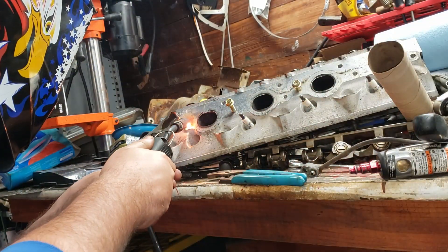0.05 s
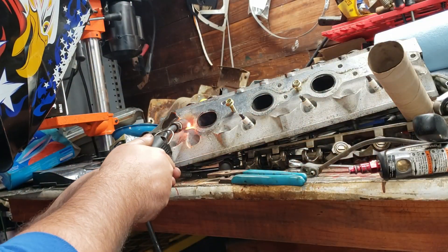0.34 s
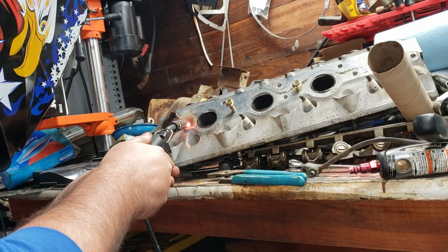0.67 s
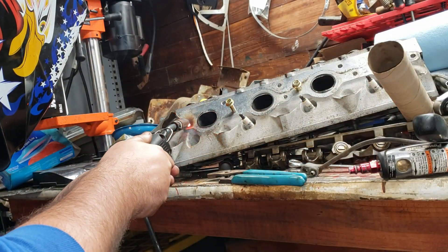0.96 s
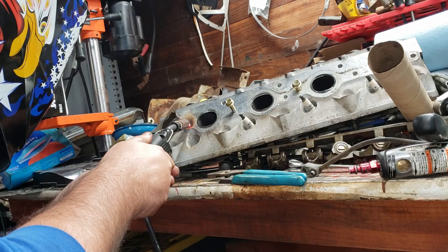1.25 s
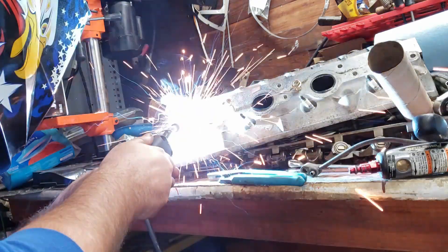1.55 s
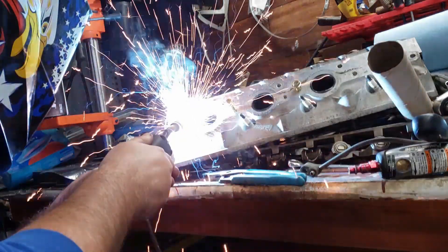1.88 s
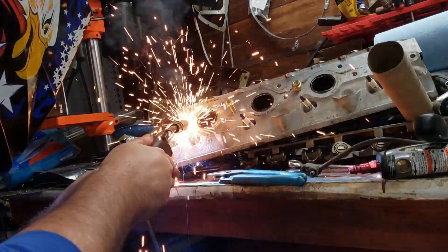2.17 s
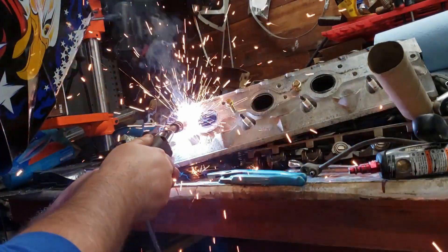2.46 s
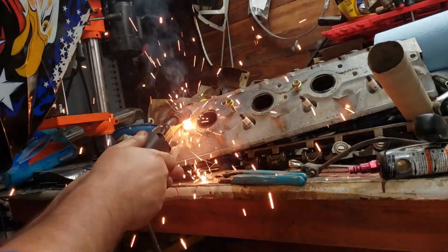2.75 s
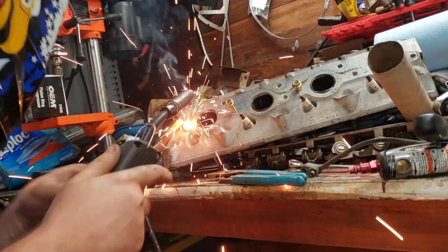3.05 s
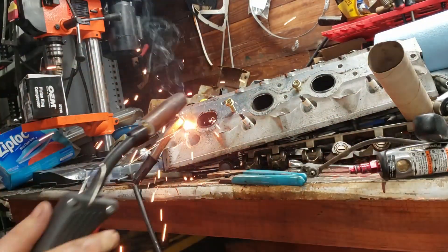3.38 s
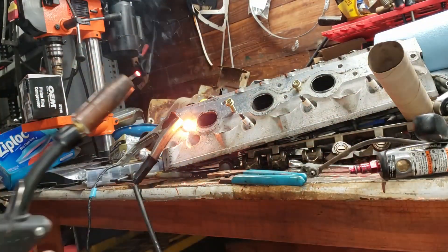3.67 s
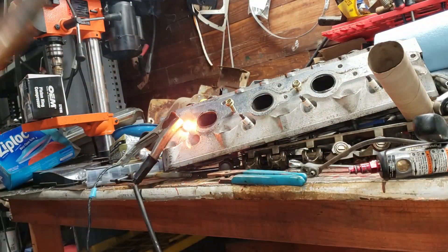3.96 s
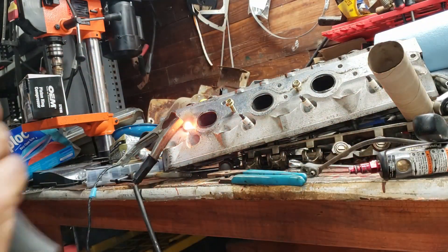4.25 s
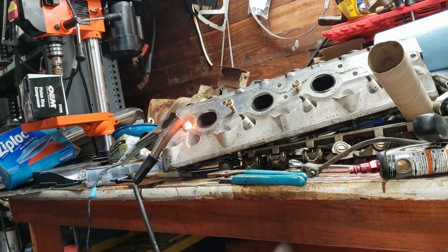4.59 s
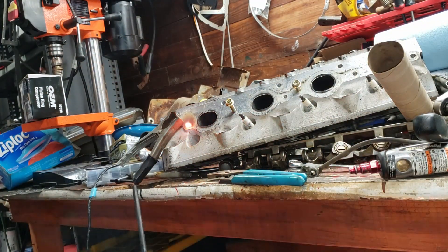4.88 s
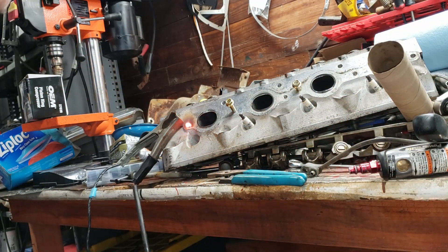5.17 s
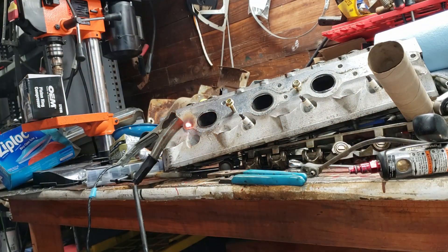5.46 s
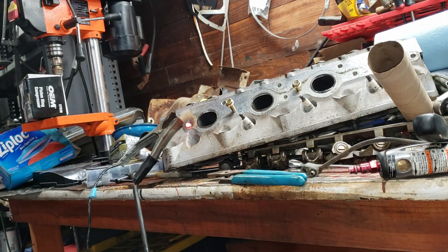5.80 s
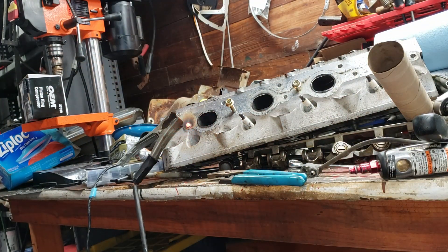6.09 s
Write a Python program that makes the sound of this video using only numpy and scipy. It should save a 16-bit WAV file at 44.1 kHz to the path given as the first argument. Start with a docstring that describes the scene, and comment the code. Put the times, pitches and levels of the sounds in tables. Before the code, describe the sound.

A wire-feed welder pops twice and crackles briefly over a machine hum, then five heavy knocks on wood follow.

```python
"""Wire welding in a garage

A wire-feed welder on the workbench, in stereo. Left of the microphone the wire strikes with two blasts,
then the arc crackles and flutters for just over a second. The torch is put down with light ticks; five
heavy knocks on wood follow, close up. Behind it all the machine hums and its fan blows, ducked under
the arc by the recorder's gain control and swelling again in the pauses."""
import sys
import numpy as np
from scipy import signal
from scipy.fft import rfft, irfft
from scipy.io import wavfile
from scipy.ndimage import uniform_filter1d, minimum_filter1d

SR = 44100
rng = np.random.default_rng(int(sys.argv[2]) if len(sys.argv) > 2 else 0)


def log_audio(samples):
    """Write samples as a 16-bit WAV file to the path given in sys.argv[1]."""
    # one column per channel
    frames = np.atleast_2d(samples).T
    # limit to full scale, then quantise
    limited = np.clip(frames, -1, 1)
    pcm = np.round(limited * 32767).astype(np.int16)
    wavfile.write(sys.argv[1], SR, pcm)


N = 270333
TIME = np.arange(N) / SR

# Levels in the tables are relative: each source sets its own gain.
# the cold wire shorts, glows with a low roar and blows apart: blast_s, crack_db, flare_db, glow_s, glow_db
WIRE_BLASTS = [(1.3561, -17, -12, .022, -30), (1.4225, -10, -6.5, .046, -21.5)]
# the loudest shorts of the wire: start_s, level_db
LOUD_SHORTS = [(1.4835, -9), (1.5044, -8), (1.5628, -10), (1.6292, -7), (1.6734, -9), (1.6974, -7),
               (1.722, -7), (1.7399, -9), (1.8292, -7), (1.8477, -9), (1.8716, -10), (1.931, -11),
               (1.954, -10), (1.9984, -11), (2.0457, -8), (2.0644, -12), (2.0794, -11), (2.0956, -8),
               (2.1296, -9), (2.1555, -11), (2.1914, -8), (2.2228, -8), (2.2544, -9), (2.2817, -10),
               (2.3226, -7), (2.3386, -7), (2.383, -12), (2.4224, -11), (2.4548, -7), (2.5556, -10),
               (2.5721, -8), (2.5964, -8)]
# spells of the arc, a first touch, a false start and two long runs: start_s, end_s, sizzle_db
ARC_SPELLS = [(1.333, 1.334, -29), (1.497, 1.525, -27.5), (1.56, 1.942, -32.5), (1.993, 2.605, -33)]
# the crackle, with a ring of the casting near 955 Hz: frequency_hz, density_db
CRACKLE_SPECTRUM = [(150, -22), (300, -5), (550, -7), (840, -5), (955, 4), (1060, -9), (1650, -2),
                    (3150, -7), (3700, -1.5), (5500, -3), (7000, 1.5), (8800, -5), (11300, 1), (13000, 0),
                    (15500, 4), (17500, -6)]
# the crack of a pop, heard straight from the arc: frequency_hz, density_db
CRACK_SPECTRUM = [(100, -6), (400, 0), (1000, -4.5), (2200, -4), (4000, 7), (9000, -15), (16000, 3)]
# the flutter of hot gas: frequency_hz, density_db
GAS_SPECTRUM = [(25, -36), (50, -9), (75, -3.5), (120, -2.5), (180, 0.5), (260, 1), (340, -10.5),
                (600, -23), (1500, -28), (4000, -83)]
# its strength while the arc burns: time_s, level_db
GAS_LEVELS = [(1.5, -38), (1.528, -35.5), (1.608, -42), (1.68, -34), (1.81, -43), (1.886, -34),
              (2.2, -38.5), (2.214, -42), (2.35, -33.5), (2.59, -40), (2.62, -40)]
# blows on wood, soft at first, then harder:
# start_s, thud_db, ring_db, corner_hz, clack_hz, clack_db, rebound_s, rebound_share
WOOD_KNOCKS = [(4.9168, -13.5, -24, 390, 336, -27, 0.0038, 0.02),
               (5.1762, -14, -16.5, 1720, 620, -26, 0.0014, 0.15),
               (5.3915, -9, -16.5, 2570, 1010, -50, 0.00202, 0.1),
               (5.6115, -9.5, -15, 3260, 1110, -13.5, .00092, 0.56),
               (5.8303, -6.5, -10, 2920, 1570, -15, 0.0011, 0.15)]
# the ring of the wood: pitch_hz, level_db, t60_s
WOOD_MODES = [(163, -21, 0.28), (179.3, -22, 0.36), (217.4, -9.5, 0.17), (246.8, -15.5, 0.29),
              (337.4, -18.5, 0.26), (363, -14, 0.22), (444, -9.5, 0.17), (638, -12.5, 0.18),
              (662, -10.5, 0.21), (644, -18, 0.27), (725, -22, 0.44), (765, -33.5, 0.76), (880, -25, 0.36),
              (989, -11, 0.17), (1600, -35, 0.13), (1730, -19, 0.24), (2263, -16, 0.097),
              (2377, -13, 0.072), (2660, -29, 0.077), (3500, -18, 0.09), (4215, -24, 0.3)]
# the noise of a knock: frequency_hz, density_db
KNOCK_SPECTRUM = [(30, -28), (100, -9), (200, -13), (310, -5), (450, -3), (700, 0.5), (1000, -3.5),
                  (1300, -10.5), (2400, -11.5), (3400, -12), (5000, -11.5), (7000, -12.5), (9000, -19.5),
                  (15500, -19.5)]
# light ticks of metal: start_s, level_db, centre_hz
TORCH_TICKS = [(2.7515, -47, 9000), (3.964, -44, 11500), (4.2955, -35.5, 12000), (4.305, -45, 9000),
               (4.342, -35, 3700), (4.497, -49, 12000)]
# the transformer's partials: multiple, level_db, left_minus_right_db, left_lead_rad
HUM_PARTIALS = [(1.005, -24, 5, 1.5), (1.998, 0, 0, 0.4), (2.99, -11, -2.5, 0.54), (4.96, -38, -12, 0.5),
                (5.96, -10, -6, -1.77), (9.84, -19, -3, 4), (11.96, -16.5, -6.5, 3.5),
                (13.96, -16, -4, 2.5), (18.15, -27.5, -15, -3.5), (22.43, -24, -1, 5)]
# the transformer, heard from a shifting position: time_s, hum_db, whine_db
TRANSFORMER_LEVELS = [(0, -51, -76), (1.3, -51, -73), (3.4, -54, -65), (3.95, -51, -66.5),
                      (4.6, -54.5, -65), (6.13, -55.5, -70)]
# the fan's tones, against the hum: pitch_hz, level_db
BLADE_TONES = [(287.8, -17), (499.7, -25.5), (596, -17.5), (695, -23.5)]
# the fan's rush and background hiss, with treble peaks from the microphone's resonance:
# frequency_hz, density_db
RUSH_AND_HISS_SPECTRUM = [(30, -18.5), (120, -16.5), (190, -10), (250, -1.5), (420, -10), (700, -9),
                          (1050, -17.5), (2600, -18), (3800, -22.5), (4600, -25.5), (6300, -29),
                          (7100, -25), (8600, -33.5), (11500, -25), (13800, -22.5), (15100, -15.5),
                          (15900, -22.5)]
# the garage's reverberation: frequency_hz, t60_s
GARAGE_DECAY = [(100, 0.34), (700, 0.23), (2500, 0.25), (7000, 0.24), (15000, 0.19)]
# likeness of the room's sound at the two microphones: frequency_hz, correlation
MIC_LIKENESS = [(60, 0.88), (200, 0.88), (500, 0.48), (1000, 0), (2500, 0.18), (15000, 0)]

HUM_HZ = 120.05  # twice the line frequency
IGNITE_S, SIZZLE_DIE_S, GAS_DIE_S = 0.0025, 0.0023, 0.072
SENSE_HZ, THRESHOLD_DB, BACK_OFF_S = 3780, -28, 0.035  # the gain control backs off fast
WAIT_S, RECOVER_DB_PER_S = 0.89, 10  # then waits and creeps up again
START_GAIN_DB, START_WAIT_S, MAX_GAIN_DB = 6, 0.7, 14.5


def arc(sizzle_gain):
    """Off to the left, pops of bursting wire over tiny spits that throb with the rectified current."""
    cracks, pops, flares = np.zeros((3, N))
    echoes = np.zeros((2, N))
    t = np.arange(SR // 50) / SR
    for start, db, *_ in WIRE_BLASTS + shorts():
        cracks[round(start * SR)] += amp(db + 16)
        add(pops, start, amp(db + 18.5) * snap(decay_s=.0007, fizz=1.7))
        # the casting scatters each pop at once, and a wall throws it back a moment later
        add(echoes, start, amp(db - 13) * diffuse(len(t)) * np.exp(-t / .005))
        add(echoes, start + .0074, amp(db - 5.5) * diffuse(len(t)) * np.exp(-t / .001))
    for start, _, flare_db, *_ in WIRE_BLASTS:
        add(flares, start, amp(flare_db + 19.5) * snap(decay_s=.0067, fizz=6.4))
    current = 2.1 + np.cos(np.pi * HUM_HZ * TIME) ** 4
    spits = rng.standard_normal(N) * (rng.random(N) < 1500 / SR)  # about 1500 a second
    spits *= amp(2.1 * np.minimum(rng.exponential(1, N), 4))
    crackle = pops + amp(.5) * sizzle_gain * unit(spits * current)
    walls = amp(.5) * convolve(crackle + flares, garage(gap_s=.0056, damping=1.11))
    spray = colour(from_left(crackle, lag_samples=4) + echoes + walls, CRACKLE_SPECTRUM)
    direct = colour(from_left(cracks, lag_samples=4), CRACK_SPECTRUM)
    return spray * amp([[.5], [-.5]]) + direct


def shorts(burst_delay_s=.001, settle_s=.04, chance=.3, jitter_s=.0012):
    """The wire shorts and bursts, as (start_s, level_db): loud pops, and lesser ones on current peaks."""
    loud = [(start + burst_delay_s, db - 7.5) for start, db in LOUD_SHORTS]
    peaks = np.arange(int(N / SR * HUM_HZ)) / HUM_HZ
    lateness, strength = rng.standard_normal((len(peaks), 2)).T
    settled = sum((peaks > start + settle_s) & (peaks < end) for start, end, _ in ARC_SPELLS) > 0
    shorted = settled & (rng.random(len(peaks)) < chance)
    lesser = np.transpose([peaks + jitter_s * lateness, -25 + 3.6 * strength])[shorted]
    return loud + list(lesser)


def burning(lull_s=.007):
    """Gains of sizzle and gas: both follow the arc; the glowing wire roars until just before a blast."""
    sizzle = sum(amp(db) * spell(start, end, SIZZLE_DIE_S) for start, end, db in ARC_SPELLS)
    sizzle *= amp(1.3 * drift(rate_hz=12))
    heat = np.max([spell(start, end, GAS_DIE_S) for start, end, _ in ARC_SPELLS], axis=0)
    gas = heat * amp(2.5 + np.interp(TIME, *np.transpose(GAS_LEVELS)))
    glow = sum(amp(glow_db) * spell(blast_s - glow_s, blast_s - lull_s, SIZZLE_DIE_S)
               for blast_s, _, _, glow_s, glow_db in WIRE_BLASTS)
    return sizzle, np.maximum(gas, glow)


def spell(start_s, end_s, die_s):
    """The envelope of one burn: it swells, holds and dies."""
    swell = np.clip((TIME - start_s) / IGNITE_S, 0, 1)
    return swell * np.exp(-np.maximum(TIME - end_s, 0) / die_s)


def flutter(gas_gain):
    """Each surge of current puffs the hot gas outward, every other one harder."""
    cycle = np.floor(HUM_HZ * TIME)
    surges = np.diff(cycle, prepend=0) * (.79 + .35 * (-1) ** cycle + rng.standard_normal(N))
    puffs = unit(surges) + .44 * rng.standard_normal(N)
    gusts = amp(-2.5) * rng.standard_normal((2, N))  # these reach each microphone separately
    gas = unit(colour(puffs + gusts, GAS_SPECTRUM)) * gas_gain
    return amp([[-2], [-1]]) * gas + amp(-10.5) * convolve(gas, garage(gap_s=.00725))


def knocks():
    """Close to the microphone, each blow gives a deep thud, a clack and the ring of the wood."""
    t = np.arange(SR // 2) / SR
    mix = np.zeros((2, N))
    sides = np.array([[1], [-1]])

    def mode(hz, db, t60_s, phase=0):
        return amp(db - 60 * t / t60_s) * np.sin(2 * np.pi * hz * t + phase)
    thud = mode(hz=194.6, db=0, t60_s=.043, phase=-1.9 + .1 * sides)
    thud *= (1 - np.exp(-t / .0025)) * amp(.5 * sides)
    wood = np.zeros((2, len(t)))
    for hz, db, t60_s in WOOD_MODES:
        phase = 2 * np.pi * rng.random()
        spread = min(hz / 1000, .8) * rng.choice([-1, 1]) * sides
        wood += mode(hz, db, t60_s, phase + spread)
    wood *= amp(-1.5) * (1 - np.exp(-t / .003))
    for start, thud_db, ring_db, corner_hz, clack_hz, clack_db, rebound_s, share in WOOD_KNOCKS:
        contact = np.pad(snap(decay_s=.0005, fizz=.9), (0, len(t) - SR // 100))
        scatter = amp(-3.5) * diffuse(len(t)) * np.exp(-t / .0073)
        crack = amp(11) * from_left(contact) + scatter
        body = wood + colour(amp(21) * garage(gap_s=.009) - crack, KNOCK_SPECTRUM)
        # the longer the contact, the less treble; a hard blow lets some of it past
        soft = signal.lfilter(*signal.butter(2, corner_hz, fs=SR), body)
        blow = soft + corner_hz / 9000 * (body - soft)
        # a hard blow touches twice within a millisecond or two, which combs its spectrum
        blow += share * np.roll(soft, round(rebound_s * SR), axis=1)
        clack = mode(clack_hz, clack_db, t60_s=.011)
        walls = amp(4.5) * convolve(clack, garage(gap_s=.008))
        add(mix, start, amp(thud_db) * thud + amp(ring_db) * blow - from_left(clack) - walls)
    # a low cut keeps deep rumble out of the knocks
    return signal.lfilter(*signal.butter(2, 70, "highpass", fs=SR), mix)


def torch_ticks():
    """Small bright contacts of metal as the torch is put down, with the room behind them."""
    ticks = np.zeros(N)
    for start, db, hz in TORCH_TICKS:
        band = signal.butter(1, [hz * .83, hz * 1.1], "bandpass", fs=SR)
        add(ticks, start, amp(db + 18) * signal.lfilter(*band, snap(decay_s=.0011, fizz=.87)))
    return from_left(ticks) + amp(-1.5) * convolve(ticks, garage(gap_s=.0011))


def machine(arm_s=4.47, arm_width_s=.09):
    """The welder, to the right: transformer hum, a thin whine, fan tones and rush with background hiss."""
    times, hum_db, whine_db = np.transpose(TRANSFORMER_LEVELS)
    hum_gain = amp(np.interp(TIME, times, hum_db))
    whine_gain = amp(np.interp(TIME, times, whine_db))
    arm = np.exp(-((TIME - arm_s) / arm_width_s) ** 2)  # an arm passes the microphone, shading the rush
    rush_gain = amp(-53.5 - 3 * arm)
    sides = np.array([[.5], [-.5]])

    def tone(hz, waver, pan_db, lead_rad):
        angle = 2 * np.pi * (hz * TIME + rng.random()) + lead_rad * sides
        wave = (1 + waver * drift(rate_hz=12)) * np.cos(angle)
        wave += waver * drift(rate_hz=15) * np.sin(angle)
        return np.sqrt(2) * amp(pan_db * sides) * wave
    hum = sum(amp(db) * tone(multiple * HUM_HZ, .08 + .028 * multiple, pan_db, lead_rad)
              for multiple, db, pan_db, lead_rad in HUM_PARTIALS)
    blades = sum(amp(db) * tone(hz, waver=.21, pan_db=5.5, lead_rad=-1.1) for hz, db in BLADE_TONES)
    whine = tone(16 * HUM_HZ, waver=.2, pan_db=-8, lead_rad=1.7)
    rush_and_hiss = unit(colour(diffuse(N), RUSH_AND_HISS_SPECTRUM))
    rush_and_hiss *= amp(.5 * drift(rate_hz=4.1) - 2 * sides)
    return hum_gain * (hum + blades) + whine_gain * whine + rush_gain * rush_and_hiss


def garage(gap_s, damping=1):
    """Reflections off the walls: they start after a gap, and each band dies at its own speed."""
    hz, t, bands = signal.stft(diffuse(SR // 2), SR, nperseg=256)
    decay = amp(-60 * damping * t / read(GARAGE_DECAY, hz)[:, None])
    _, tail = signal.istft(bands * decay, SR, nperseg=256)
    tail = np.pad(tail, ((0, 0), (round(gap_s * SR), 0)))[:, :SR // 2]
    return tail / np.linalg.norm(tail) * np.sqrt(2)


def diffuse(size):
    """White noise at the two microphones, alike in the bass."""
    left, other = rfft(rng.standard_normal((2, size)))
    likeness = read(MIC_LIKENESS, np.fft.rfftfreq(size, 1 / SR))
    right = likeness * left + np.sqrt(1 - likeness ** 2) * other
    return irfft(np.array([left, right]), size)


def from_left(x, lag_samples=6):
    """The work lies to the left: its sound reaches the right microphone a little later."""
    return np.array([x, np.roll(x, lag_samples)])


def snap(decay_s, fizz):
    """A click with a brief spray of noise behind it, together of energy 1."""
    t = np.arange(SR // 100) / SR
    spray = rng.standard_normal(len(t)) * np.exp(-t / decay_s)
    burst = fizz * spray / np.linalg.norm(spray) + (t == 0)
    return burst / np.linalg.norm(burst)


def drift(rate_hz):
    """A slow random wander of rms 1."""
    hz = np.fft.rfftfreq(N, 1 / SR)
    return unit(irfft(rfft(rng.standard_normal(N)) * np.exp(-(hz / rate_hz) ** 2), N))


def colour(x, spectrum):
    """Pass x through a minimum-phase filter of energy 1 shaped like the spectrum."""
    hz = abs(np.fft.fftfreq(4096, 1 / SR))
    log_gain = np.log(amp(read(spectrum, hz)))
    taps = np.fft.ifft(np.exp(np.conj(signal.hilbert(log_gain)))).real[:2048]
    return convolve(x, taps / np.linalg.norm(taps))


def read(points, hz):
    """Interpolate a table along a logarithmic frequency axis."""
    frequencies, values = np.transpose(points)
    return np.interp(np.log(hz + 1), np.log(frequencies + 1), values)


def convolve(x, response):
    return signal.oaconvolve(np.atleast_2d(x), np.atleast_2d(response), axes=1)[:, :x.shape[-1]]


def add(mix, start_s, sound):
    part = mix[..., round(start_s * SR):][..., :sound.shape[-1]]
    part += sound[..., :part.shape[-1]]


def amp(db):
    return 10 ** (np.asarray(db) / 20)


def unit(x):
    return x / np.sqrt(np.mean(x ** 2) + 1e-20)


def gain_control(x, block=128):
    """Loud treble turns the recorder's gain down; after a quiet wait it rises, and the machine swells."""
    treble = signal.lfilter(*signal.butter(2, SENSE_HZ, "highpass", fs=SR), x)
    power = uniform_filter1d((treble ** 2).mean(0), size=2 * block)[::block]
    step_s = block / SR
    gain_db, wait_s, curve_db = START_GAIN_DB, START_WAIT_S, []
    for treble_db in 10 * np.log10(abs(power) + 1e-12):
        curve_db.append(gain_db)
        over_db = treble_db + gain_db - THRESHOLD_DB
        wait_s -= step_s
        if over_db > 0:
            gain_db = max(gain_db - over_db * step_s / BACK_OFF_S, 0)
            wait_s = WAIT_S
        elif wait_s < 0:
            gain_db = min(gain_db + RECOVER_DB_PER_S * step_s, MAX_GAIN_DB)
    return x * amp(np.interp(TIME, TIME[::block], curve_db))


def scene():
    """The garage as it reaches the microphones at the bench."""
    sizzle_gain, gas_gain = burning()
    return machine() + arc(sizzle_gain) + flutter(gas_gain) + torch_ticks() + knocks()


def record(dry):
    """The recorder: gain control, a fast limiter that holds peaks near full scale, then the band limit."""
    loud = gain_control(dry)
    limiter = np.minimum(1, .97 / (abs(loud) + 1e-9))
    limiter = uniform_filter1d(minimum_filter1d(limiter, size=45, axis=1), size=45, axis=1)
    lowpass = signal.firwin(401, cutoff=15900, window=("kaiser", 9), fs=SR)
    return signal.oaconvolve(loud * limiter, lowpass[None], "same", axes=1)


dry = scene()
out = record(dry)
log_audio(out)
```